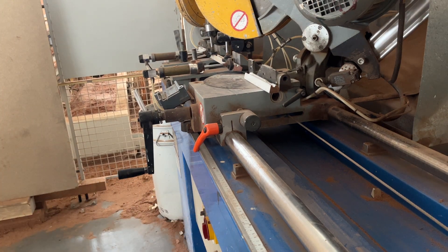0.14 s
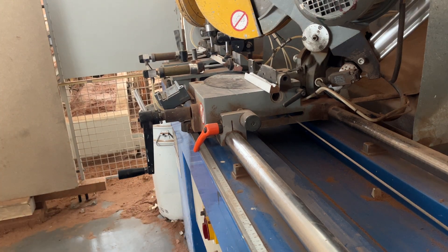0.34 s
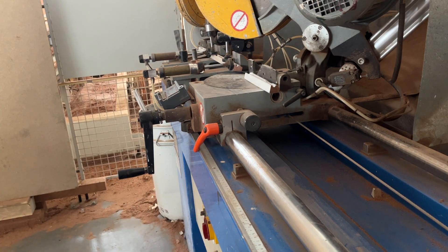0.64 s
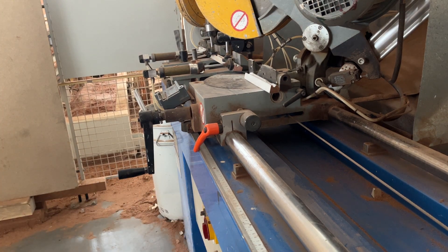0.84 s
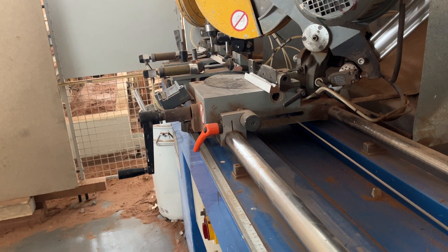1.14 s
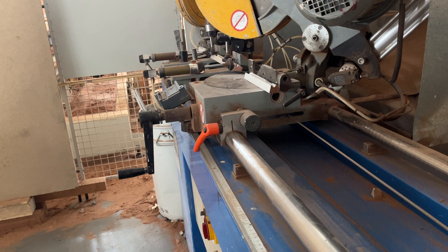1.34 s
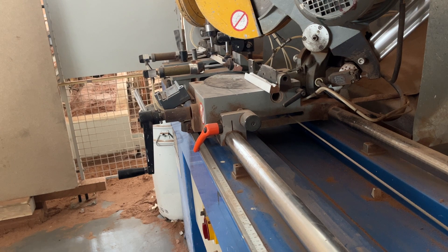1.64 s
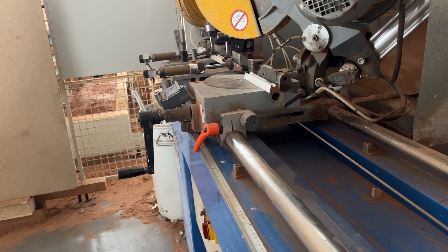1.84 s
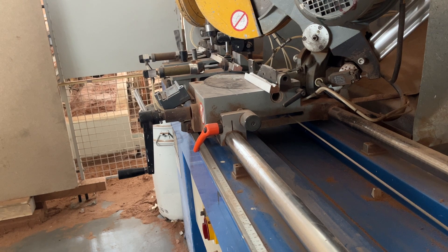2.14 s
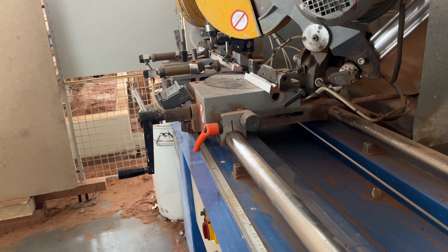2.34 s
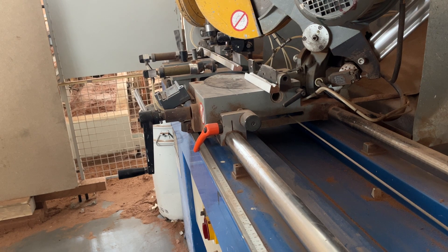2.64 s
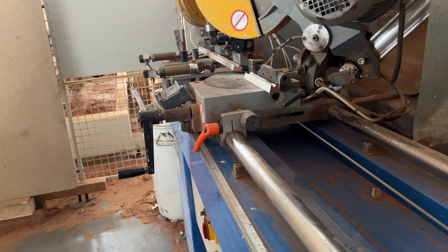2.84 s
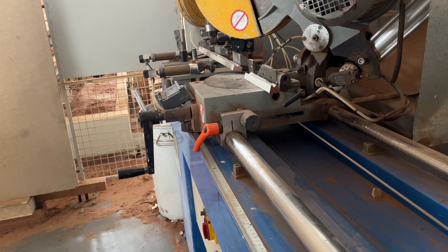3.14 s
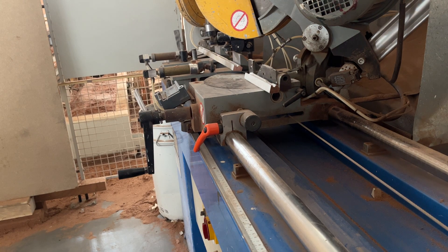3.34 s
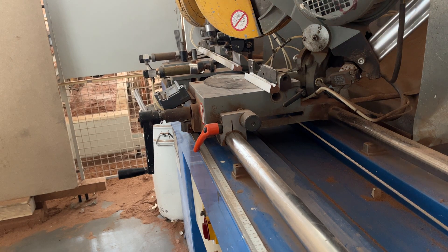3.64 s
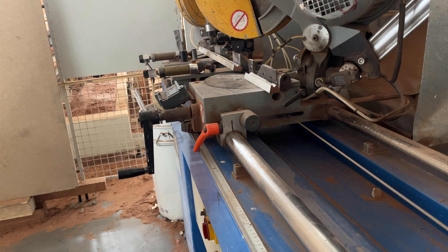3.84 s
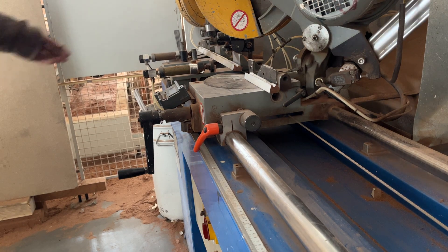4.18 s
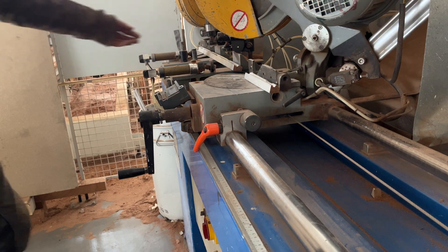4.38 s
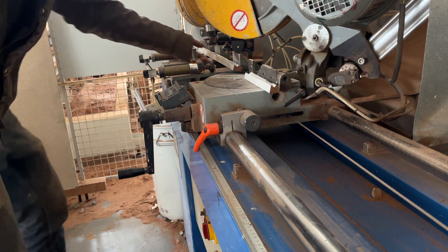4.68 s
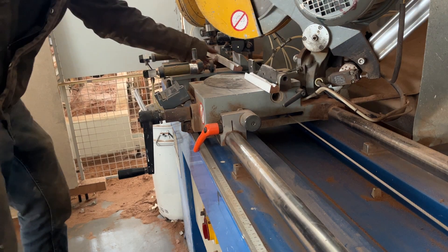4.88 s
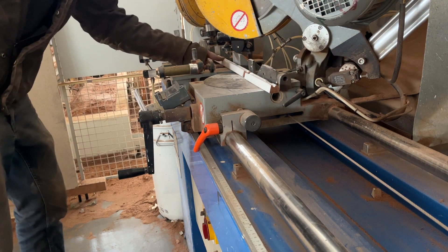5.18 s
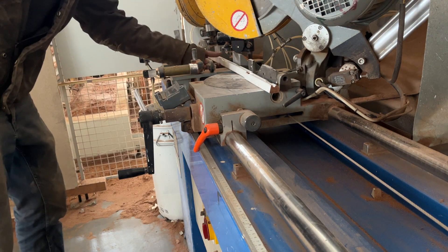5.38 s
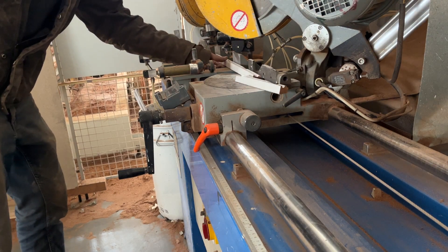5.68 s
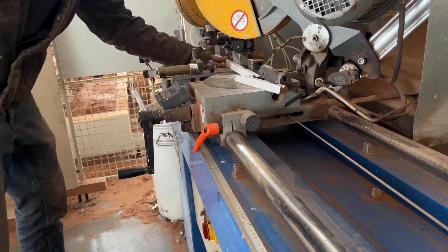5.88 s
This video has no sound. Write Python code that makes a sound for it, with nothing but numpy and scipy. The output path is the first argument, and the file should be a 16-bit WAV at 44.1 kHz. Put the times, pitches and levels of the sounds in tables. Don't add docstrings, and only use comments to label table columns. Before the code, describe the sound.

Close stereo phone pickup of a saw coasting towards a stop. The whirr slides down in pitch and the hiss thins quickest, leaving a soft rumble. A knock, then one dominant heavy clunk with an air puff just before one second; steel clamps snap near the middle; shoes brush sawdust and chips tick; near the end light metal is knocked and scraped against a fence, ringing into the reverberant room.

```python
import sys
import numpy as np
from scipy import signal
from scipy.fft import rfft, irfft
from scipy.io import wavfile
from scipy.ndimage import uniform_filter1d

SR = 44100
rng = np.random.default_rng(int(sys.argv[2]) if len(sys.argv) > 2 else 0)


def dump(signal):
    limited = np.clip(np.atleast_2d(signal).T, -1, 1)
    pcm = np.round(limited * 32767).astype(np.int16)
    wavfile.write(sys.argv[1], SR, pcm)


def boost(x):
    u = np.asarray(x, float) / 20
    return 10 ** u


N = 265393
T = np.arange(N) / SR
M = 270000
HZ = np.maximum(np.fft.rfftfreq(M, 1 / SR), 1)


def on_hz(table, hz=HZ):
    f, v = np.transpose(table)
    return np.interp(np.log(hz), np.log(np.maximum(f, 1)), v)


def over_time(table):
    return np.interp(T, *np.transpose(table))


def unit(x):
    return x / np.sqrt(np.mean(x ** 2))


def shape(x, gain):
    return irfft(rfft(x, M) * gain, M)[..., :N]


def bins_hz(t):
    return np.fft.rfftfreq(len(t), 1 / SR) + 1


def bump(hz, centre_hz, octaves):
    return np.exp(-0.5 * (np.log2(hz / centre_hz) / octaves) ** 2)


def decay(t, t60_s):
    return np.exp(-np.log(1000) * t / t60_s)


def resonances(table):
    return np.sqrt(sum(boost(2 * db) / (1 + (2 * (HZ - hz) / width_hz) ** 2) for hz, width_hz, db in table))


def walk(rate_hz):
    k = int(SR / rate_hz)
    steps = np.repeat(rng.standard_normal(N // k + 1), k)[:N]
    return unit(uniform_filter1d(uniform_filter1d(steps, k), k))


def wander(rate_hz):
    return np.array([walk(rate_hz), walk(rate_hz)])


def add(track, s, sound):
    i = int(s * SR)
    track[..., i:i + sound.shape[-1]] += sound[..., :N - i]


def swell(t, hold_s, fall_s):
    rise_s = 0.35 * hold_s
    return np.clip(t / rise_s, 0, 1) * np.exp(-np.clip(t - rise_s - hold_s, 0, None) / fall_s)


CENTRES_HZ = 30 * 2 ** (np.arange(14) * 2 / 3)
BANDS = np.array([np.exp(-4.5 * np.log2(HZ / c) ** 2) for c in CENTRES_HZ]) + 1e-9


def restless(gain, flicker_db, rate_hz):
    noise = rfft(rng.standard_normal((2, M))) * gain / BANDS.sum(axis=0)
    power = gain ** 2
    live = [band for band in BANDS if band @ power > 1e-3 * np.sum(power)]
    return unit(sum(boost(flicker_db * walk(rate_hz)) * irfft(noise * band, M)[:, :N] for band in live))


# t/s, tooth rate/Hz
TEETH = [(0, 785.2), (.3, 745), (.8, 680.4), (1.5, 598), (2.1, 520.3), (2.9, 434.9), (3.5, 400),
         (4.3, 363.1), (5.2, 332), (6.02, 307.5)]
TOOTH_HZ = over_time(TEETH)
# t/s, level re coasting/dB
SHAKE = [(0, 2.5), (.33, 0), (.48, -1), (.58, -17.5), (.77, -12.5), (1.0, 3), (1.17, -3), (1.42, -4),
         (1.66, 1), (2.5, 2), (2.8, 6.5), (3.25, 1), (3.62, -0.5), (4.99, -4.5), (5.13, 13), (5.31, 4),
         (5.48, -0.5), (6.02, 0)]


def coasting(full_speed_db, loss_db, shake_share):
    halvings = np.log2(TOOTH_HZ[0] / TOOTH_HZ)
    return boost(full_speed_db - loss_db * halvings + shake_share * over_time(SHAKE))


WHISTLES = [(.58, 30, -14), (.88, 16, -3), (1, 17, -1), (1.13, 15, -2), (1.26, 20, -8), (1.36, 20, -4),
            (1.45, 20, -7), (1.67, 24, -8), (1.9, 30, -8), (2.58, 26, 0), (2.8, 30, -2), (3.45, 26, 2),
            (1.12, 160, -2), (3.1, 220, 1)]
# t/s, level/dB
SING = [(0, -2), (.3, 1.5), (.65, 0), (.9, -3), (1.3, 3), (1.7, 1.5), (2.05, 3.5), (2.4, -3), (2.9, -3),
        (3.25, -1), (3.55, 4.5), (3.8, -2), (4.0, -0.5), (4.3, 3), (4.7, -1.5), (5.0, 2.5), (5.5, 1),
        (6.02, 0.5)]
# f/Hz, width/Hz, level/dB
GUARD = [(349, 50, 2), (400, 48, 4.5), (428, 12.5, 7), (504.3, 29.4, 3.5), (606, 14.5, -1), (693, 22, 5),
         (745, 22, -1.5), (867.5, 27, -1), (1000, 24.4, -1), (1048, 13, -6), (1235, 45, -15.5),
         (1670, 43, -8), (2000, 32, -13), (2420, 21, -14.5)]


def blade():
    turn = 2 * np.pi * np.cumsum(TOOTH_HZ) / SR
    whistle = np.zeros((2, N))
    for k, rate_hz, db in WHISTLES:
        whistle += boost(db) * (wander(rate_hz) * np.cos(k * turn) + wander(rate_hz) * np.sin(k * turn))
    guard = resonances(GUARD)
    sing = coasting(-42.5, 10.1, 0.19) * boost(over_time(SING)) * unit(shape(whistle, guard))
    whirr = coasting(-44.5, 4.04, 0.8) * restless(guard, 3, 5.407)
    stall_hz, stall_db = 338.4, 57
    stall = boost(-stall_db * np.clip(np.log2(stall_hz / TOOTH_HZ), 0, None))
    return stall * (whirr + sing)


# f/Hz, density/dB per Hz
RUMBLE = [(25, -38), (40, -10.5), (65, -1.5), (95, -4), (130, -0.5), (170, -7.5), (230, -12.5), (320, -25),
          (600, -49.5)]


def rumble():
    return coasting(-40.5, 5.83, 0.59) * restless(boost(on_hz(RUMBLE)), 2.1, 9.0)


# f/Hz, density/dB per Hz
WIND = [(400, -27), (800, 3.5), (1150, 5.5), (1400, 0), (1800, 3), (2500, -0.5), (3500, -7.5),
        (5000, -16.5), (7000, -14.5), (10500, -26), (14000, -32.5)]


def wind():
    return coasting(-42.5, 16.3, 0.025) * restless(boost(on_hz(WIND)), 0.69, 10.0)


# f/Hz, density/dB per Hz
HISS = [(1500, -48), (3000, -2), (4500, 0), (6500, -21), (8300, 5.5), (10500, -4.5), (11500, -4.5),
        (12600, -9), (13600, -14), (14600, -14), (16000, -40) ]
# t/s, hold/s, fall/s, level/dB
BLEEDS = [
    (0.856, 0.22, 0.47, -51.5),
    (3.41, 1.83, 0.13, -67),
]


def hiss():
    power = coasting(-54.5, 13.1, 0.021) ** 2
    for s, hold_s, fall_s, db in BLEEDS:
        power = power + (boost(db) * swell(T - s, hold_s, fall_s)) ** 2
    return np.sqrt(power) * restless(boost(on_hz(HISS)), 0.25, 23.9)


def saw():
    return rumble() + blade() + wind() + hiss()


# t/s, level/dB, f/Hz, length/s
THUDS = [(0.381, -23, 125, 0.015), (0.36, -27, 217, 0.0094), (0.484, -33.5, 128, 0.024),
         (0.8375, -18, 91, 0.017), (0.892, -9, 93.8, 0.015), (0.931, -21.5, 94, 0.032),
         (1.008, -32, 100, 0.014), (1.05, -32, 100, 0.025), (1.098, -26.5, 107, 0.017),
         (5.885, -41, 118, .01), (2.677, -31.5, 116, 0.044), (2.72, -28, 174, 0.014),
         (2.934, -43, 270, 0.016), (2.8, -27, 132, 0.0099), (5.088, -30.5, 431.7, 0.02),
         (5.093, -33, 240, 0.01), (5.224, -42.5, 300, 0.063), (5.63, -45.5, 290, 0.054),
         (5.7, -44.5, 290, 0.05), (4.95, -45.5, 280, 0.031), (0.33, -50, 760, .015),
         (1.15, -35, 1000, 0.016), (0.79, -38.5, 840, 0.0094), (2.9, -41, 920, 0.019)]


def thuds():
    out, t = np.zeros(N), T[:SR // 2]
    for s, db, hz, length_s in THUDS:
        swing = np.sin(2 * np.pi * hz * t) * np.exp(-((t - 0.63 / hz) / length_s) ** 2)
        ring = 0
        for ratio, mode_db, longer in [(0.72, -7, 2.6), (1.33, -15, 1.3)]:
            ring = ring + boost(mode_db) * np.sin(2 * np.pi * hz * ratio * t) * np.exp(-t / (length_s * longer))
        push = 1 - np.exp(-t * hz / 0.67)
        add(out, s, boost(db) * (swing + ring) * push)
    return out


def rushes(table, source, colour, octaves):
    out, t = np.zeros(N), T[:2 ** 15]
    source = np.tile(shape(source, colour), 2)
    for s, hold_s, fall_s, db, hz in table:
        piece = source[int(s * SR):][:len(t)]
        band = irfft(rfft(piece) * bump(bins_hz(t), hz, octaves), len(t))
        add(out, s, boost(db) * swell(t, hold_s, fall_s) * unit(band))
    return out


# t/s, hold/s, fall/s, level/dB, f/Hz
VENTS = [
    (.828, 0.01, 0.012, -31.5, 7650),
    (.874, 0.013, 0.011, -28.5, 4230),
    (.885, 0.038, 0.16, -37.5, 3160),
    (1.022, 0.007, 0.0044, -38, 8060),
    (1.075, 0.0098, 0.013, -37, 8450),
]
# f/Hz, width/Hz, level/dB
NOZZLE = [(3280, 500, 3), (6400, 900, -6)]


def vents(noise):
    return rushes(VENTS, noise, 1 + resonances(NOZZLE), 1.14)


def taps(events, modes, t60_s, crack_db, crack_hz, octaves):
    out, t = np.zeros(N), T[:SR // 3]
    hz, db, mode_t60_s = np.transpose(modes)[:, :, None]
    bins, fade = bins_hz(t), decay(t, t60_s)
    for s, peak_db, ring_hz, ring_db, tilt_db in events:
        strength = boost(db + 3 * rng.standard_normal(hz.shape) + tilt_db * np.log2(hz / 2000))
        lengths_s = np.clip(mode_t60_s, 0.02, 1.3 * t60_s)
        body = np.sum(strength * np.sin(2 * np.pi * hz * t) * decay(t, lengths_s), axis=0)
        colour = bump(bins, crack_hz, octaves) * boost(tilt_db * np.log2(bins / 2000))
        colour = colour / (1 + (550 / bins) ** 4)
        crack = irfft(rfft(rng.standard_normal(len(t))) * colour, len(t))
        tap = body / np.abs(body).max() + boost(crack_db) * unit(crack) * fade
        tap = tap + boost(ring_db) * np.sin(2 * np.pi * ring_hz * t) * fade
        tap = tap * (1 - np.exp(-t / 0.00016))
        add(out, s, boost(peak_db) * tap / np.abs(tap).max())
    return out


# f/Hz, level/dB, t60/s
CLAMP = [(770, 0, .07), (910, -3, .08), (1060, -5, .08), (1868, -3, .08), (2320, 0, .07), (2700, -8, .05),
         (3200, -6, .05), (3750, -5, .06), (4400, -12, .07), (5000, -14, .06), (6083, -20, .05)]
# t/s, peak level/dB, ring f/Hz, ring level/dB, hardness/dB per octave
CLAMP_TICKS = [(0.363, -28.5, 1050, 5, -5.5), (1.053, -36, 1045, 10, 14), (2.662, -32, 2390, -10, 5.5),
               (2.712, -32, 3180, -18, 0.5), (2.911, -34, 2710, -14, 1), (3.095, -39, 1848, 2, 4),
               (3.12, -49, 1670, -12, -5), (3.15, -45, 1350, -6, -12), (3.233, -46, 1846, -26, -20)]


def clamps():
    return taps(CLAMP_TICKS, CLAMP, 0.073, -10, 2100, 1.0)


CLAMP_PING = [
    (2.717, -45, 4385, 10, 0),
    (2.92, -56, 4950, 10, 0),
]


def pings():
    return taps(CLAMP_PING, CLAMP, 0.15, -12, 3900, 0.74)


# f/Hz, level/dB, t60/s
PROFILE = [(953, 0, .06), (1345, -8, .12), (1453, -8, .1), (2040, -6, .09), (2490, -8, .09),
           (2815, -1, .07), (3080, -5, .08), (3289, -2, .06), (3540, -6, .07), (3800, -6, .12),
           (4183, -4, .045), (4829, -7, .08), (5281, -14, .07), (5739, -12, .08), (6621, -18, .07)]
PROFILE_KNOCKS = [(4.95, -26.5, 2832, -11, 1.5), (5.031, -36.5, 3060, 0.5, 15), (5.045, -48, 4180, -3, -3),
                  (5.074, -50, 2970, -5, 15), (5.061, -36, 2990, -7, -3), (5.089, -33.5, 914, -2, -3),
                  (5.201, -31, 2760, 4.5, 13), (5.208, -29, 1316, -8, -4), (5.226, -31.5, 3047, 22, 20),
                  (5.235, -33, 2870, -1, -7), (5.481, -40, 2962, -3, -10), (5.526, -34.5, 1980, 0, 7),
                  (5.61, -43, 2000, 3, 7), (5.64, -44.5, 2510, 6, 8), (5.699, -31.5, 3490, -18, -2),
                  (5.15, -46, 1310, -3, 1), (5.735, -46, 1880, 3, -4), (5.77, -52, 2000, 6, 2),
                  (5.808, -50, 1960, 6, -4), (5.988, -59, 1680, 6, -4)]


def knocks():
    return taps(PROFILE_KNOCKS, PROFILE, 0.061, -9, 2300, 0.83)


# t/s, level/dB, f/Hz, t60/s
CLAMP_RINGS = [(.362, -37, 1800, 0.071), (.375, -34.5, 1058, 0.32), (.485, -40, 380, 0.2),
               (.881, -33.5, 1150, 0.098), (.88, -36, 800, .09), (1.022, -40, 930, 0.094),
               (.945, -43, 760, 0.053), (.875, -30, 3000, 0.11), (.897, -35, 3190, 0.11),
               (1.028, -34, 3270, 0.039), (1.05, -32, 770, .06), (0.9, -32, 1680, 0.069),
               (1.056, -35, 1035, .07), (1.052, -33, 3200, 0.046), (2.662, -30.5, 780, 0.042),
               (2.666, -36.5, 1854, .11), (2.662, -35.5, 2323, 0.062), (2.661, -41, 3600, 0.085),
               (2.67, -44, 914, 0.11), (2.711, -33, 1310, 0.044), (2.711, -38, 1580, 0.035),
               (2.712, -35, 2730, 0.024), (2.712, -32, 3270, 0.028), (2.712, -37.5, 673, 0.067),
               (2.912, -41.5, 545, 0.21), (2.912, -50, 800, 0.064), (2.916, -46, 2750, 0.05),
               (2.92, -49, 3700, 0.077), (2.912, -43, 4000, 0.037), (2.835, -47, 1600, 0.063),
               (3.048, -57, 4400, .05), (3.096, -36, 770, 0.051), (3.095, -40, 1640, .05),
               (3.097, -46, 2000, 0.054), (3.4, -50, 1700, 0.05), (3.4, -54, 1400, 0.044),
               (3.13, -38, 1500, 0.1), (3.155, -40, 1230, 0.07)]
PROFILE_RINGS = [(4.95, -40, 2860, 0.046), (4.951, -39, 2980, .06), (4.949, -37, 3280, 0.052),
                 (4.95, -38, 3540, 0.054), (4.95, -37, 3830, .06), (5.031, -45, 950, .07),
                 (5.031, -51, 1265, .07), (5.032, -45, 4100, .07), (5.06, -47, 2842, 0.076),
                 (5.062, -47, 920, .07), (5.087, -36, 883, .06), (5.088, -46, 672, 0.072),
                 (5.096, -42, 1740, 0.048), (5.2, -37, 3580, 0.089), (5.201, -40, 4700, 0.068),
                 (4.95, -39, 5700, 0.048), (4.95, -36, 4140, .06), (4.955, -40, 957, 0.064),
                 (5.2, -36, 2770, 0.059), (5.202, -42, 1723, 0.053), (5.22, -34, 724, 0.069),
                 (5.215, -37, 2870, .08), (5.228, -40, 2150, 0.086), (5.265, -55, 3810, 0.34),
                 (5.27, -59, 2110, .2), (5.29, -53, 1490, 0.18), (5.291, -52, 2560, .15),
                 (5.325, -52, 2560, 0.4), (5.3, -57, 1325, 0.45), (5.311, -61, 1680, 0.27),
                 (5.331, -53, 3040, .3), (5.38, -61, 3790, .3), (5.433, -58, 1740, 0.041),
                 (5.481, -53, 2900, .05), (5.482, -55, 3850, 0.06), (5.484, -51, 720, 0.077),
                 (5.526, -42, 3820, 0.068), (5.527, -42, 1670, 0.14), (5.527, -34.5, 2040, 0.1),
                 (5.578, -57, 3095, .2), (5.598, -61, 4700, .25), (5.635, -45.5, 457, 0.19),
                 (5.638, -47, 1720, 0.067), (5.699, -35.5, 3450, 0.042), (5.705, -40.5, 1794, 0.088),
                 (5.699, -38, 2300, 0.033), (5.701, -39, 4220, .04), (5.699, -43, 6400, 0.03),
                 (5.703, -41, 720, 0.044)]


def rings():
    out, t = np.zeros(N), T[:SR // 3]
    for s, db, hz, t60_s in CLAMP_RINGS + PROFILE_RINGS:
        pair = np.sin(2 * np.pi * hz * t) + boost(-8) * np.sin(2 * np.pi * hz * 1.011 * t)
        add(out, s, boost(db) * pair * decay(t, t60_s) * (1 - np.exp(-t / 0.001)))
    return out


# t/s, hold/s, level/dB, f/Hz
BODIES = [(0.362, 0.0048, -35.5, 1000), (.365, .015, -38, 450), (0.489, 0.013, -43, 600),
          (0.882, 0.0098, -35, 1090), (1.047, 0.021, -35.5, 1150), (0.83, 0.021, -46, 2100),
          (4.414, 0.022, -63, 3300), (2.665, 0.0054, -35.5, 850), (2.71, 0.02, -43.5, 910),
          (2.912, 0.021, -49.5, 715), (3.088, 0.021, -42.5, 1000), (4.946, 0.01, -40, 1000),
          (5.085, 0.011, -37, 640), (5.185, 0.049, -44.5, 790), (5.488, 0.0084, -62, 870),
          (5.523, 0.012, -40.5, 970), (5.626, 0.017, -48, 700), (5.701, 0.0045, -41, 895),
          (2.712, .004, -44, 3300), (2.912, .008, -44, 2900), (3.094, 0.0093, -58, 3220),
          (4.948, 0.0031, -39, 3900), (5.481, 0.0054, -64, 3600), (5.699, 0.0025, -43.5, 3670)]


def bodies():
    fall_s = 0.0096
    table = [(s, hold_s, fall_s, db, hz) for s, hold_s, db, hz in BODIES]
    return rushes(table, rng.standard_normal(N), 1, 0.71)


# t/s, hold/s, fall/s, level/dB, f/Hz
DRAGS = [(4.96, .04, 0.05, -55, 4200), (5.09, 0.023, 0.034, -60, 3000), (5.13, 0.072, 0.028, -55, 3000),
         (5.028, 0.016, 0.016, -49, 3200), (5.058, 0.013, 0.033, -48.5, 2980),
         (5.205, 0.028, 0.017, -39, 2510), (5.25, 0.15, 0.05, -57, 2600), (5.481, 0.003, 0.04, -50.5, 3100),
         (5.54, 0.1, 0.044, -59.5, 3000), (5.71, 0.03, 0.11, -60, 2000)]
# f/Hz, width/Hz, level/dB
DRAG_RING = [(1346, 22, 28.5), (1520, 30, 23.5), (1680, 12, 20), (2110, 81, 13), (2510, 25, 13),
             (2870, 57, -11), (3060, 37, 4), (3570, 24, 11), (3760, 21, 13.5), (4100, 180, 5),
             (4700, 90, -8), (5130, 110, -33)]


def drags(noise):
    struck = rng.random(N) < 2500 / SR
    grains = noise * struck * boost(2.5 * rng.exponential(size=N))
    return rushes(DRAGS, grains, boost(-20) + resonances(DRAG_RING), 1.1)


# t/s, hold/s, fall/s, level/dB, f/Hz
SCUFFS = [(2.09, 0.087, 0.035, -61.5, 8060), (3.838, 0.014, 0.069, -47, 4900),
          (4.38, 0.011, 0.031, -53, 10000), (4.41, 0.053, 0.027, -53.5, 7300), (4.64, .16, .05, -66, 5000),
          (4.635, 0.028, 0.022, -62, 10500), (4.835, .02, .015, -64, 11000)]


def scuffs(noise):
    return rushes(SCUFFS, noise * boost(1.5 * walk(120)), 1, 1.9)


CHIP_TICKS = [(3.3362, -50, 4430, 3, 3.13), (3.3904, -50, 4340, 6, 2.6), (3.449, -45, 3600, -19, 8),
              (3.458, -39, 3600, -19, 13), (3.5712, -51, 3250, 6, 2.7), (3.8154, -61, 4425, -4, 2.95),
              (3.845, -44, 3300, -4, 3), (5.088, -40.5, 5800, -3, 4), (4.2605, -51, 3840, 8, 2.5),
              (4.8858, -48.5, 3604, 9, 2.9)]


def chips():
    return taps(CHIP_TICKS, CLAMP, 0.024, 3.2, 3900, 0.97)


# f/Hz, t60/s
SHOP_T60 = [(60, 0.57), (500, 1.1), (3000, 1.16), (12000, 0.12)]


def shop(x):
    t = T[:2 ** 16]
    noise = rfft(rng.standard_normal((2, len(t))))
    tail = np.zeros((2, len(t)))
    for centre_hz in 60 * 2.0 ** np.arange(9):
        tail += irfft(noise * bump(bins_hz(t), centre_hz, 0.86)) * decay(t, on_hz(SHOP_T60, centre_hz))
    tail = tail * np.clip(t / 0.0076, 0, 1) / np.sqrt(np.sum(tail[0] ** 2))
    return boost(-13) * signal.oaconvolve(tail, x[None], axes=1)[:, :N]


# f/Hz, level/dB
PORT_APART = [(40, -17), (130, -19.5), (290, -9.5), (600, -7), (1300, -3), (2000, -10), (4000, -10.5),
              (6500, -9.5), (7700, -26), (8900, -26), (10500, -13), (14000, -11)]


def scene():
    noise = rng.standard_normal(N)
    near = vents(noise) + drags(noise) + scuffs(noise) + clamps() + chips() + knocks() + bodies()
    lone, table = rings(), thuds()
    ring_room = boost(-6)
    common, apart = saw() + shop(near + ring_room * lone + boost(0.5) * table)
    near = near + lone

    share = boost(on_hz(PORT_APART))
    notch_hz = 8350
    leak = boost(-19) * 20 * np.log(HZ / notch_hz) * bump(HZ, notch_hz, 0.23)
    lag = shape(near, -1j * (share + leak))
    lean = boost(-21) * near + boost(-22) * table
    apart = shape(apart, share) + lag + lean
    return near + pings() + table + common + np.array([apart, -apart])


def roll_off(x):
    return signal.sosfilt(signal.butter(12, 15280, fs=SR, output="sos"), x)


# f/Hz, left lead/rad
PORT_PHASE = [(0, 0), (260, -0.2), (1210, 3.6), (1460, 3.6), (1720, 6.3), (2930, 7.2), (4820, 6.8),
              (5680, 5.5), (7320, 4.4), (7670, 3.3), (8870, 3.0), (11100, 0.3), (13000, -0.2),
              (14800, -3.3)]
# f/Hz, left minus right level/dB
PORT_BALANCE = [(60, 0), (390, 0), (520, -3), (690, 6), (1000, 2), (1400, 1.5), (1700, 3), (2000, -1),
                (2600, 3), (3500, 5), (4700, 1), (7600, 0), (14000, 0)]


def record(dry):
    phase = np.interp(HZ, *np.transpose(PORT_PHASE))
    lean = boost(on_hz(PORT_BALANCE) / 2) * np.exp(0.5j * phase)
    top_hz = 14950
    top = 1 / np.sqrt(1 + (HZ / top_hz) ** 150)
    mix = shape(dry, np.array([lean, 1 / lean]) * top)
    return roll_off(mix)


dry = scene()
out = record(dry)
dump(out)
```